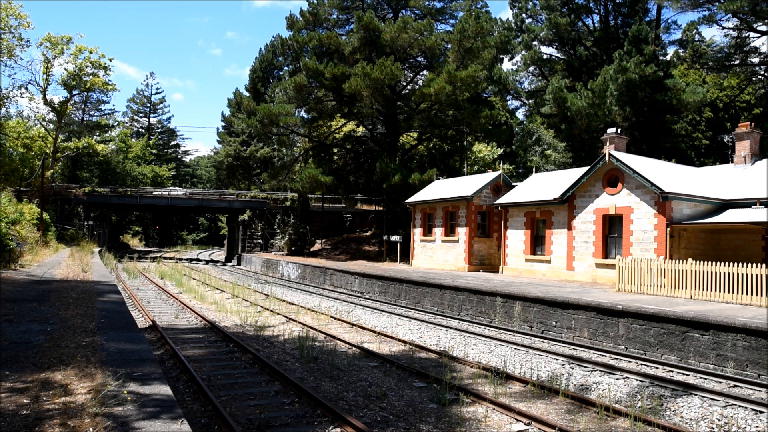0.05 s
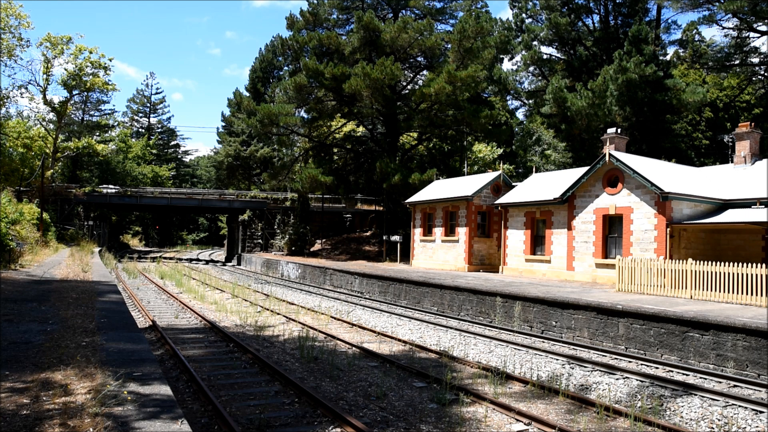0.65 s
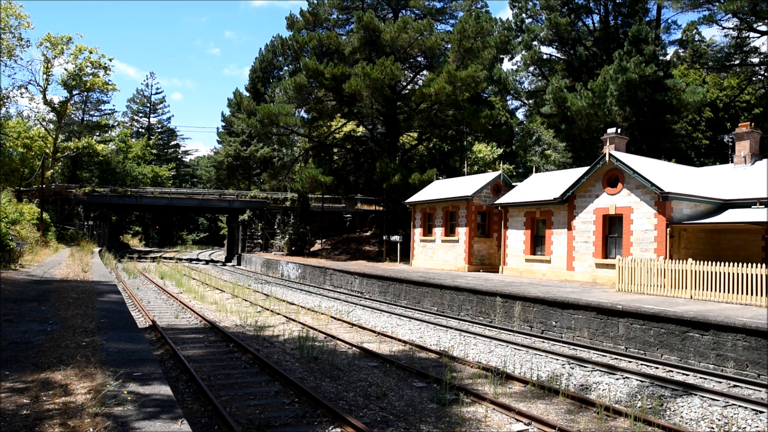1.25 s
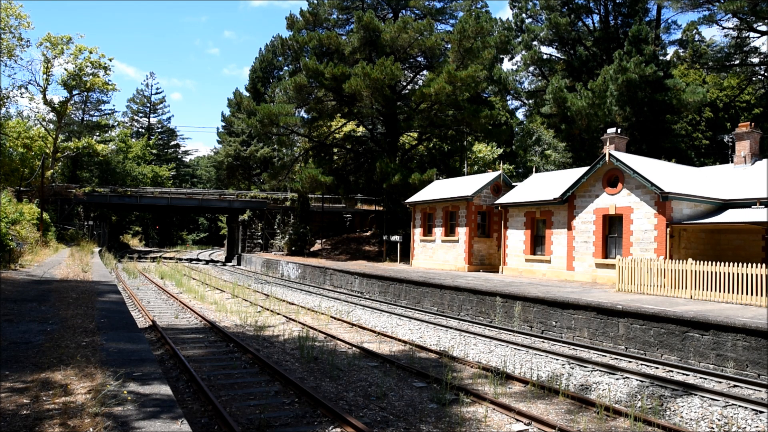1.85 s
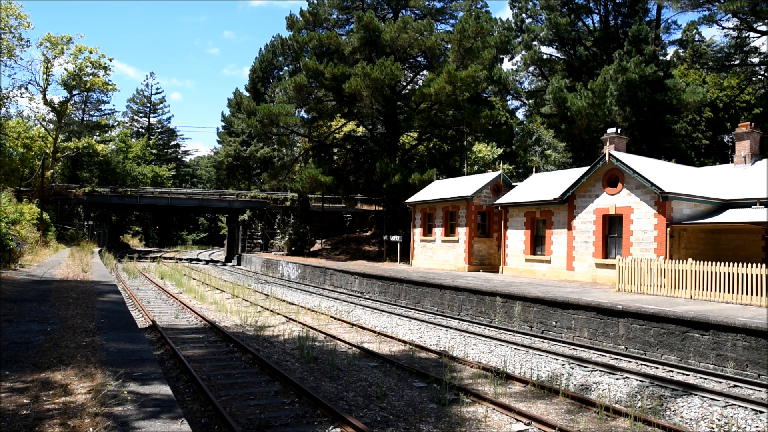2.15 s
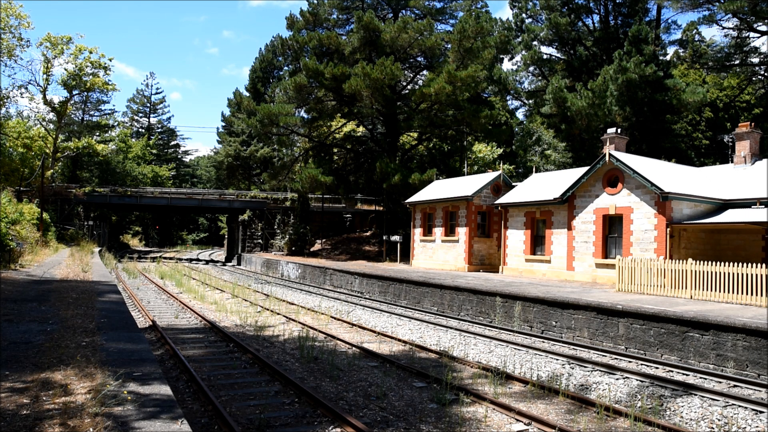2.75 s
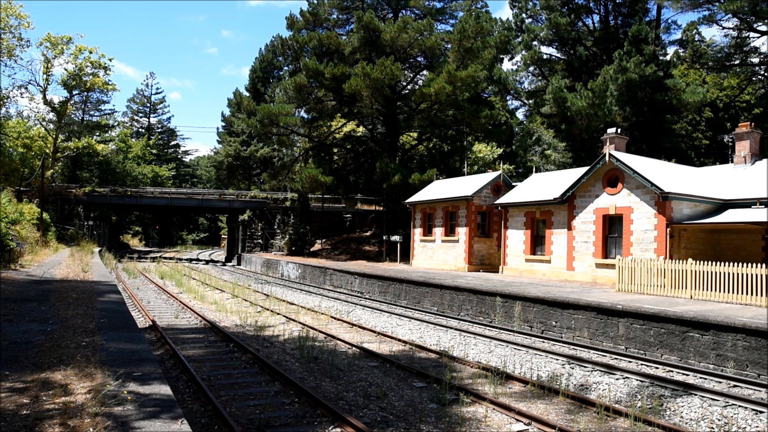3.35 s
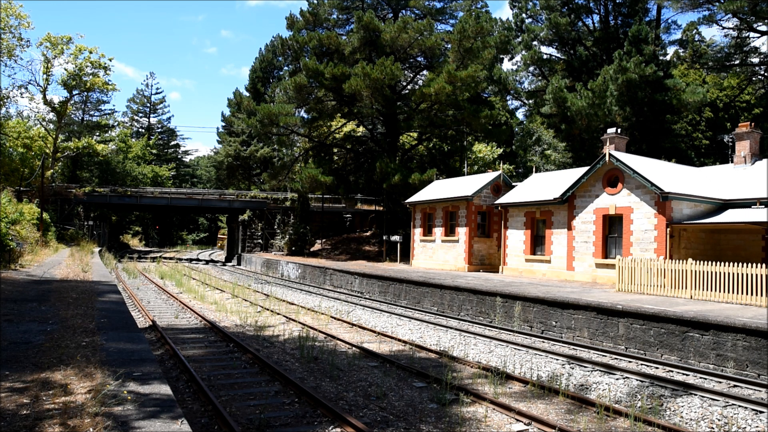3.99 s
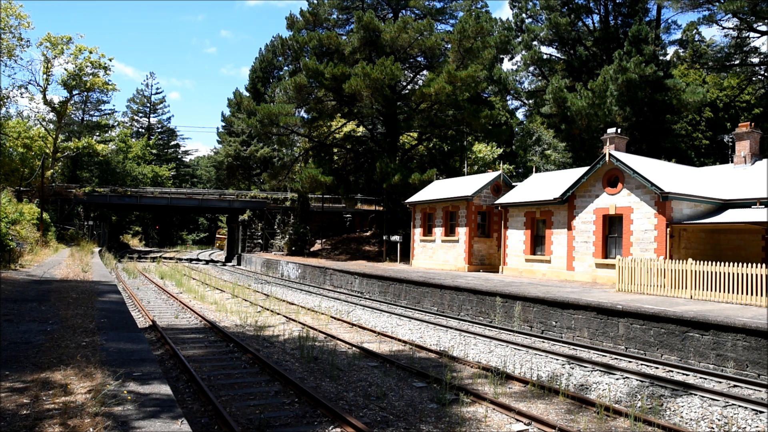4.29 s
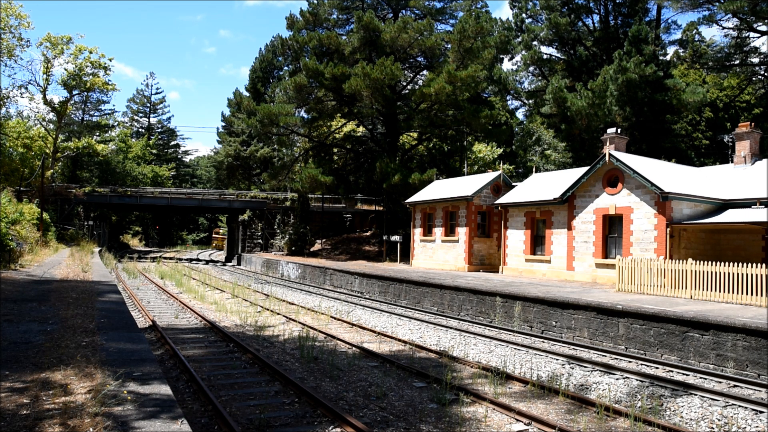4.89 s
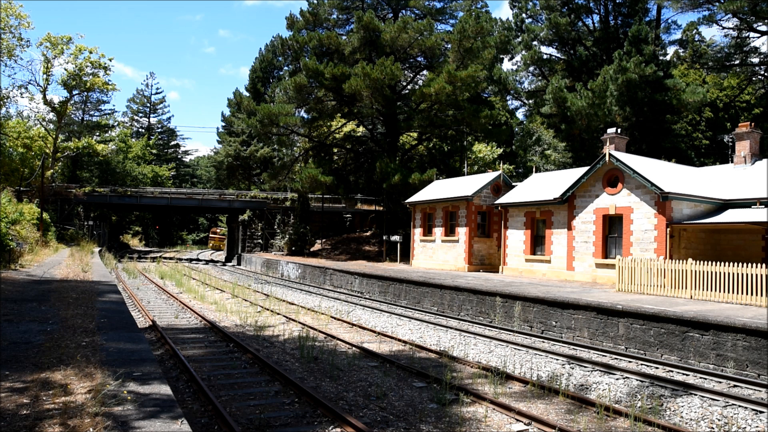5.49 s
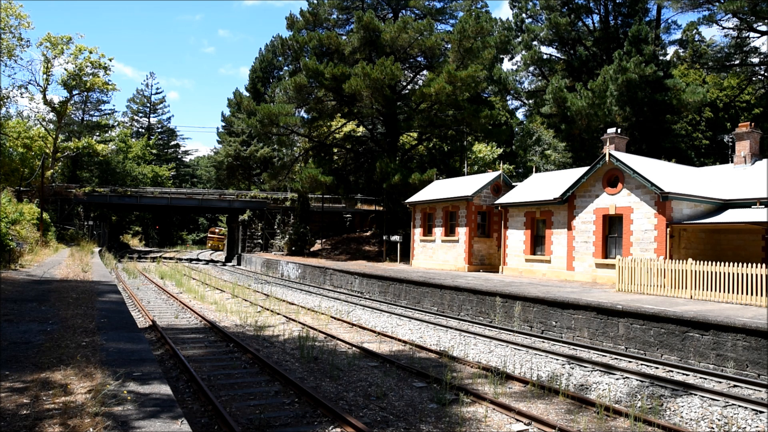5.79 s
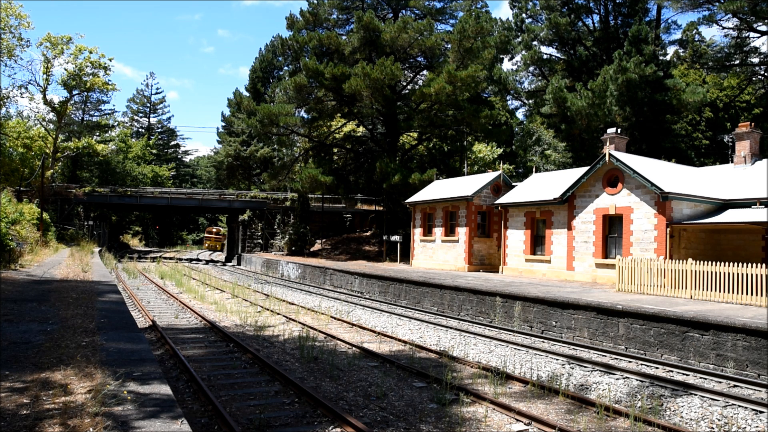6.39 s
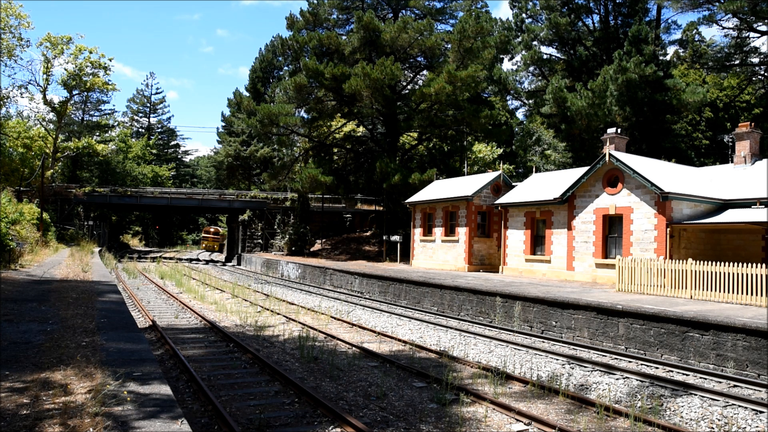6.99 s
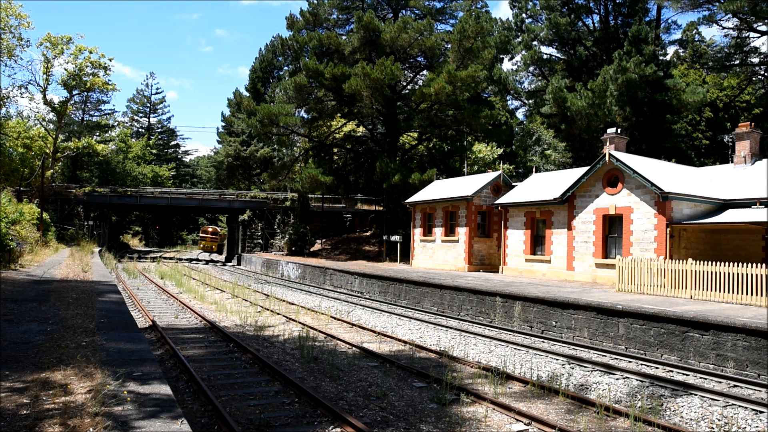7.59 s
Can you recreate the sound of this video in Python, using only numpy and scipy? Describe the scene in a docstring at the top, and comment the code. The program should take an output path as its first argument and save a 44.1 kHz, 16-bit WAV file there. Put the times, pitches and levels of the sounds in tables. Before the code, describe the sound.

A diesel freight train approaches a quiet country station, its steel wheels squealing louder and louder over a rolling roar.

```python
"""A diesel freight train rounds a curve towards a quiet country station among tall trees.
From the start the engine drones and whines under the roar of the rolling wagons. Many slipping wheels
squeal on the same few notes, and single wheels sing out above the rest. As the train nears, the wheel
rims (flanges) hiss louder against the rail. From five seconds on, the lowest squeal blares in bursts."""
import sys
import numpy as np
from scipy import signal
from scipy.fft import rfft, irfft
from scipy.io import wavfile
from scipy.ndimage import uniform_filter1d, minimum_filter1d

SR = 44100
rng = np.random.default_rng(int(sys.argv[2]) if len(sys.argv) > 2 else 0)


def to_wav(sig):
    """Store sig (one row per channel, or 1-D mono) as 16-bit WAV at the path in sys.argv[1].

    Samples outside -1..1 are clipped; the rate is SR.
    """
    pcm = np.clip(np.atleast_2d(sig), -1, 1) * 32767
    pcm = np.round(pcm).astype(np.int16)
    wavfile.write(sys.argv[1], SR, pcm.T)  # frames by channels


N = 336924
T, HZ = np.arange(N) / SR, np.fft.rfftfreq(N, 1 / SR)
START_DISTANCE_M, SPEED_M_PER_S = 210, 14.15
CRANK_HZ, CYLINDERS = 15.36, 8
BLOWER_HZ, BLOWER_DB = 825, -44

# Levels are relative: the functions add their own gains.
# the engine's firing note: t/s, level/dB
FIRING_LEVEL = [(0.0, -53), (0.22, -64), (0.38, -49), (0.95, -49), (1.2, -60), (1.6, -62), (1.8, -49),
                (2.3, -48), (2.65, -43.5), (3.45, -42), (3.72, -49), (4.35, -43), (5.6, -42.5), (6.6, -44),
                (6.95, -62), (7.6, -51)]
# other exhaust notes: multiple of the crank rate, level/dB
EXHAUST_NOTES = [(4, -18), (5, -15.5), (6, -11.5), (7, -8.5), (9, -3), (10, -2), (11, -9.5), (12, -8),
                 (13, -12), (14, -11), (15, -9), (16, -6), (18, -11), (22, -0.5), (23, 1), (25, 0),
                 (26, -1.5)]
# gear whines: f/Hz, level/dB
GEAR_NOTES = [(299.5, -51.5), (484, -52), (599, -46.5), (726, -44.5), (902, -53), (968, -45), (1050, -46),
              (1101, -53), (1210, -44.5), (1265, -48.5), (1374, -48), (1449, -50)]
# peaks of the blower's whine: t/s, level/dB
BLOWER_SWELLS = [(0.03, -38), (0.38, -38), (0.93, -33.5), (1.66, -36.5), (3.1, -42), (3.95, -36.5),
                 (4.43, -33.5), (5.38, -30.5), (6.13, -30.5), (7.12, -31.5), (7.55, -35)]
# the rolling roar: t/s, level/dB
ROLLING_LEVEL = [(0.0, -30.5), (0.08, -30.5), (1.45, -28.5), (2.26, -28.5), (4.25, -26), (7.64, -24)]
# tone colours of wagon rumble, wheel roar, rail hiss, top hiss and grinding rims: f/Hz, level/dB
RUMBLE_COLOUR = [(25, -34.5), (50, -25.5), (85, -24), (125, -16), (190, -19.5), (270, -15), (340, -10),
                 (430, -12), (580, -9), (700, -6.5), (900, -33)]
ROAR_COLOUR = [(380, -12), (600, -10.5), (760, -5), (1000, -5), (1350, -2.5), (1650, -4.5), (1900, -6),
               (2450, -17)]
RAIL_COLOUR = [(1700, -26.5), (1950, -6), (2400, -2.5), (3200, -4.5), (4000, -7), (4800, -10.5),
               (6400, -13), (8000, -25), (9000, -35)]
TOP_HISS_COLOUR = [(8500, -26), (9700, -13), (10400, -9.5), (10750, -7), (11400, -7.5), (12700, -6),
                   (14300, -1), (16000, 4.5)]
FLANGE_COLOUR = [(6600, -22), (6950, -18), (7140, -0.5), (7215, 1), (7260, -1), (7360, -3), (7460, -9),
                 (7700, -12), (8000, -19), (8400, -45)]
# the grinding rims: t/s, level/dB
FLANGE_LEVEL = [(0.0, -38), (2.9, -33), (3.5, -35), (4.3, -31.5), (5.5, -31.5), (6.3, -27), (7.0, -28),
                (7.6, -27)]
# three notes at which wheels ring, each followed by its rough octave; a skirt is a band's soft edge:
# f/Hz, spread/Hz, skirt level/dB, skirt width/spreads, level/dB, rise/dB per dB of nearness
WHEEL_NOTES = [(2024, 90, -11, 1.2, -38, 0.0), (4020, 110, -8, 1.5, -60.5, 2.4),
               (5516, 180, -3, 1.1, -30.3, 1.75), (10900, 450, -8, 1.5, -55.5, 0.9),
               (7080, 170, -6, 1.2, -31.3, 1.7), (14205, 90, -6, 3.0, -49, 1.1)]
# swells of the low, middle and high wheel notes and of two octaves: t/s, level/dB
LOW_SWELL = [(0.0, 4.5), (0.25, -0.5), (1.3, -5), (2.0, 3.5), (3.6, 6.5), (4.3, 11.5), (4.9, 12),
             (5.4, 15.5), (6.3, 17), (6.8, 18.5), (7.05, 16.5), (7.3, 10.5), (7.64, 5.5)]
LOW_OCTAVE_SWELL = [(0.0, -1), (3.2, -1), (5.0, 2), (5.55, 4), (5.8, 10.5), (6.5, 4), (6.8, 13.5),
                    (7.3, 10.5), (7.6, 3)]
MIDDLE_SWELL = [(0.0, -1), (0.33, -4), (0.45, -1.5), (1.2, 0.5), (1.4, 0), (2.7, 0), (3.3, 0.5), (4.35, 0),
                (5.0, 0.5), (6.3, 0.5), (7.4, 1)]
MIDDLE_OCTAVE_SWELL = [(0.0, -2), (2.15, -11), (2.35, 2), (2.75, 3), (3.2, -1), (4.2, 0), (5.4, -6),
                       (6.35, -1), (6.6, -2), (7.3, -7.5), (7.6, -7)]
HIGH_SWELL = [(0.0, 1.5), (0.5, -0.29), (1.6, -1.4), (3.0, -1.8), (3.5, 0.57), (3.8, -0.46), (5.2, 0.62),
              (6.2, 0.53), (7.6, 0.71)]
# single wheels singing out: start t/s, length/s, f/Hz, glide/Hz per s, level/dB, roughness (0-1)
SOLO_SQUEALS = [(-0.1, 0.9, 14234, 0, -41.5, 0.1), (0.36, 0.28, 14212, 0, -39, 0.1),
                (0.33, 1.0, 7123, 0, -32, 0.2), (0.33, 0.42, 5502, -20, -31, 0.3),
                (0.4, 0.9, 7042, 0, -36, 0.3), (0.45, 0.15, 2031, 0, -32.5, 0.6),
                (1.25, 0.45, 14233, 0, -42.5, 0.1), (1.22, 0.8, 5512, -10, -33, 0.6),
                (1.4, 1.55, 5604, 0, -30.5, 0.4), (1.7, 0.2, 5490, 0, -29, 0.5),
                (1.7, 1.45, 7122, 0, -31, 0.2), (1.93, 0.25, 2010, 0, -35, 0.7),
                (2.05, 1.6, 14234, 0, -41, 0.1), (2.24, 0.6, 12619, 0, -42.5, 0.35),
                (2.25, 0.75, 11055, 0, -49, 0.3), (2.95, 0.4, 5600, 0, -31, 0.3),
                (3.05, 0.35, 1990, 0, -31, 0.7), (3.0, 1.45, 7122, 0, -28, 0.2),
                (3.15, 0.48, 14168, 0, -43.5, 0.1), (3.2, 0.45, 14298, 0, -45, 0.1),
                (3.3, 0.4, 7188, 0, -30, 0.2), (3.43, 0.12, 7188, 0, -25, 0.1),
                (3.4, 0.26, 5592, 0, -27.5, 0.3), (3.75, 0.2, 2032, 0, -28.5, 0.6),
                (3.8, 0.7, 11055, 0, -48.5, 0.3), (3.9, 1.15, 14233, 0, -43.5, 0.2),
                (4.35, 0.3, 7123, 0, -28, 0.2), (4.4, 0.95, 12772, 0, -52, 0.4),
                (4.68, 0.32, 7123, 0, -22.5, 0.2), (4.6, 1.1, 14196, 0, -47, 0.2),
                (4.95, 0.27, 5568, -50, -21.5, 0.3), (5.15, 0.27, 7123, 0, -23, 0.2),
                (5.3, 0.4, 5545, -70, -26, 0.5), (5.25, 1.55, 2028, 0, -27.5, 0.8),
                (5.45, 0.58, 5502, -4, -21, 0.3), (5.58, 0.4, 7123, 0, -24.5, 0.3),
                (5.55, 1.05, 7092, -95, -27.5, 0.7), (5.65, 1.6, 12772, 0, -50, 0.4),
                (5.7, 1.1, 14233, 0, -41, 0.15), (6.05, 1.85, 7123, 0, -20, 0.2),
                (6.08, 0.38, 5500, -30, -20.5, 0.5), (6.2, 0.68, 2058, 0, -22, 0.6),
                (6.4, 1.45, 14198, 0, -41.5, 0.2), (6.46, 0.17, 7230, 0, -24, 0.2),
                (6.45, 1.1, 11055, 0, -44.5, 0.3), (6.7, 1.1, 14298, 0, -46.5, 0.2),
                (7.05, 0.6, 14234, 0, -38, 0.1), (6.75, 0.5, 5452, 0, -28, 1),
                (7.2, 0.65, 5440, -20, -25.5, 0.8), (6.95, 0.55, 5614, 0, -27.5, 0.7)]
# faint, very high wheel notes: f/Hz, level/dB
RING_NOTES = [(10908, -60), (11055, -62), (12620, -61), (12772, -65)]
# blares of the lowest wheel note: peak t/s, f/Hz, level/dB
BLARES = [(5.02, 2040, -20), (5.102, 2035, -19.5), (5.16, 2030, -22), (5.226, 2030, -17.5),
          (5.305, 2025, -20), (5.37, 2020, -17.5), (5.445, 2025, -18), (5.73, 2025, -19), (5.82, 1995, -17),
          (5.985, 2045, -21), (6.14, 2060, -20), (6.25, 2060, -16.5), (6.32, 2055, -15.5),
          (6.42, 2030, -18.5), (6.522, 2025, -13), (6.585, 2056, -18), (6.705, 2056, -13.5),
          (6.885, 2010, -15), (7.13, 2030, -18)]
# how alike left and right sound: f/Hz, likeness (0-1)
STEREO_LIKENESS = [(30, .75), (120, 0.9), (1000, 0.89), (2000, 0.9), (3000, 0.99), (4700, 0.89),
                   (5500, 0.99), (6300, 0.66), (7100, 0.65), (8000, 0.84), (11000, 0.26), (14200, 0.9)]
# how far the left microphone opening leads the right: f/Hz, phase/rad
LEFT_LEAD = [(30, 0.26), (1000, 0.27), (3000, 0.78), (4400, 1.43), (5500, 1.3156), (6600, 1.5), (7100, 1.2),
             (7800, -1.2), (10500, -0.45), (11700, 3), (12500, -3), (13600, -1.5), (15500, -2.5)]
# how much louder the left opening is: f/Hz, level/dB
LEFT_BOOST = [(30, 4), (100, -3), (350, -2.5), (700, 0), (1400, -1), (2000, 1.5), (3500, -0.5), (5500, 1.5),
              (7100, 1), (11000, 0.5), (12700, 7.5), (14200, -2.5), (15500, 0.5)]
# the microphone's deep dip in the treble: f/Hz, level/dB
TREBLE_DIP = [(8000, 0.5), (8280, -8.5), (8400, -34), (9550, -22), (9700, -9), (10500, 2.5)]


def from_db(db):
    """Turn decibels into a gain."""
    return 10 ** (np.asarray(db) / 20)


def rms_one(x):
    """Scale a signal to an average strength (rms) of 1."""
    return x / np.sqrt(np.mean(x ** 2) + 1e-20)


def in_time(points):
    """Read a time table at every sample."""
    return np.interp(T, *np.transpose(points))


def at_hz(points, hz=HZ):
    """Read a table on a log-frequency axis."""
    f, value = np.transpose(points)
    return np.interp(np.log(hz + 1), np.log(f + 1), value)


def colour(points):
    """Gain at each frequency, falling steeply beyond the table's ends."""
    outside = np.minimum(1, np.minimum(HZ / points[0][0], points[-1][0] / (HZ + 1)))
    return from_db(at_hz(points)) * outside ** 8


def drift(rate_hz):
    """A smooth random wobble, about 1 in size."""
    pole = np.exp(-200 * np.pi * rate_hz / SR)
    steps = rng.standard_normal(N // 100 + 2002)   # one per 100 samples, plus time to settle
    slow = signal.lfilter([1], [1, -2 * pole, pole * pole], steps)[2000:]
    return np.interp(np.arange(N) / 100, np.arange(len(slow)), rms_one(slow))


def noise(gain):
    """Stereo noise of a given colour, partly alike left and right."""
    mid, side = rng.standard_normal((2, len(HZ))) + 1j * rng.standard_normal((2, len(HZ)))
    alike = np.clip(at_hz(STEREO_LIKENESS), 0, .99)
    spectrum = np.sqrt(1 + alike) * mid + np.sqrt(1 - alike) * side * [[1], [-1]]
    return rms_one(irfft(gain * spectrum, N))


def tone(hz, scatter, flutter_hz):
    """A pure tone plus shifting reflections, which make it fade and flutter."""
    phase = 2 * np.pi * (np.cumsum(hz + np.zeros(N)) / SR + rng.random())
    fading = (1 + scatter * drift(flutter_hz)) * np.cos(phase)
    return rms_one(fading + scatter * drift(flutter_hz) * np.sin(phase))


def smear(hz, spread_hz):
    """A narrow band: motion shifts one pitch differently along each echo path (Doppler effect)."""
    return 1 / np.sqrt(1 + (2 * (HZ - hz) / spread_hz) ** 16)


def nearness_db():
    """Level gained as the train nears: 0 dB at first, 6 dB more at half the distance."""
    return 20 * np.log10(START_DISTANCE_M / np.maximum(START_DISTANCE_M - SPEED_M_PER_S * T, 1))


def exhaust(speed):
    """Eight firings a turn make the drone; unequal cylinders add other multiples of the crank rate."""
    crank_hz = CRANK_HZ * speed
    firing = from_db(in_time(FIRING_LEVEL) - 3.5) * tone(CYLINDERS * crank_hz, 0.22, flutter_hz=2.5)
    others = sum(from_db(db) * tone(k * crank_hz, 0.55, flutter_hz=1.75) for k, db in EXHAUST_NOTES)
    return firing + from_db(-53 + 0.68 * nearness_db()) * others


def gears(speed, whine_db=-5.5, echo_db=-37.0, echo_drop=0.0163):
    """Gears whine. Tree echoes of gears and blower lack the Doppler rise, so they lie just below."""
    whine = sum(from_db(db) * tone(hz * speed, 0.52, flutter_hz=1.77) for hz, db in GEAR_NOTES)
    notes = GEAR_NOTES + [(BLOWER_HZ, BLOWER_DB)]
    echoes = noise(sum(from_db(db) * smear(hz * (1 - echo_drop), 2 * echo_drop * hz) for hz, db in notes))
    return from_db(1.28 * nearness_db()) * (from_db(whine_db) * whine + from_db(echo_db) * echoes)


def blower(speed, width_s=0.11):
    """The engine's air blower: one thin whine that swells and sinks about once a second."""
    swells = sum(from_db(db) * np.exp(-.5 * ((T - s) / width_s) ** 2) for s, db in BLOWER_SWELLS)
    return np.hypot(swells, from_db(BLOWER_DB)) * tone(BLOWER_HZ * speed, 0.36, flutter_hz=2.7)


def wagons(unrest_db=0.5):
    """Rough steel rolls on rough steel: the bodies rumble, wheels and rails roar and hiss."""
    level_db = in_time(ROLLING_LEVEL)
    rumble_db = level_db.mean() - 11 + 0.74 * (level_db - level_db.mean())
    rumble = from_db(rumble_db + unrest_db * drift(3.8)) * noise(colour(RUMBLE_COLOUR))
    roar = from_db(-1.9) * noise(colour(ROAR_COLOUR)) + from_db(-7) * noise(colour(RAIL_COLOUR))
    hiss = from_db(-36.5 + 0.43 * nearness_db() + unrest_db * drift(2.5)) * noise(colour(TOP_HISS_COLOUR))
    return rumble + from_db(level_db + unrest_db * drift(27.0)) * roar + hiss


def flanges():
    """The wheel rims grind along the rail with a sharp hiss."""
    return from_db(in_time(FLANGE_LEVEL)) * noise(colour(FLANGE_COLOUR))


def wheel_chorus(surge_db=0.46, surge_hz=10.0):
    """Unequal wheels and echoes blur each note into a band; slipping adds soft edges and surges."""
    swells = (LOW_SWELL, LOW_OCTAVE_SWELL, MIDDLE_SWELL, MIDDLE_OCTAVE_SWELL, HIGH_SWELL, HIGH_SWELL)
    out = 0
    for swell, (hz, spread_hz, skirt_db, skirt_width, level_db, rise) in zip(swells, WHEEL_NOTES):
        skirt = from_db(skirt_db) / (1 + (2 * (HZ - hz) / spread_hz / skirt_width) ** 2)
        gain = from_db(level_db + rise * nearness_db() + in_time(swell) + surge_db * drift(surge_hz))
        out = out + gain * noise(np.hypot(smear(hz, spread_hz), skirt))
    return out


def wheel_solos(attack_s=0.073, waver=0.0008, flutter_hz=13.3, chatter_db=3.0, chatter_hz=21.0):
    """A wheel sticks and slips in step with one note and sings; some notes sink as it turns away."""
    out = 0
    for start, length, hz, glide, db, rough in SOLO_SQUEALS:
        age = T - start
        release_s = min(0.18, length / 2)
        ramp = np.clip(np.minimum(age / attack_s, (length - age) / release_s), 0, 1)
        envelope = from_db(db) * np.sin(np.pi / 2 * ramp)
        pitch = hz * (1 + waver * rough * drift(flutter_hz)) + glide * age
        # the rougher the squeal, the more its echoes differ left and right and its grip chatters
        unlike = np.sqrt(1 - np.clip(at_hz(STEREO_LIKENESS, hz), 0, 1))
        side = 2.6 * rough * unlike * drift(flutter_hz) * np.sin(2 * np.pi * np.cumsum(pitch) / SR)
        chatter = from_db(chatter_db * rough * drift(chatter_hz))
        out = out + envelope * chatter * (tone(pitch, rough, flutter_hz) + side * [[1], [-1]])
    return out


def thin_rings(swell_db=1.5, swell_hz=0.57):
    """Very high notes come and go as one wheel after another rubs the rail."""
    out = 0
    for hz, db in RING_NOTES:
        gain = from_db(db + 0.91 * nearness_db() + swell_db * drift(swell_hz))
        out = out + gain * tone(hz, 0.56, flutter_hz=8.0)
    return out


def wheel_bursts(width_s=0.012, waver=0.004, octave_db=-24):
    """The lowest wheel note catches and blares for an instant, with a faint octave above."""
    peaks_s, hz, _ = np.transpose(BLARES)
    pitch = np.interp(T, peaks_s, hz) * (1 + waver * drift(19.8))
    phase = 2 * np.pi * np.cumsum(pitch) / SR
    envelope = sum(from_db(db) * np.exp(-.5 * ((T - s) / width_s) ** 2) for s, _, db in BLARES)
    return envelope * rms_one(np.sin(phase) + from_db(octave_db) * np.sin(2 * phase))


def limiter(x, window=441):
    """Turn the sound down for a few milliseconds around any peak above 1."""
    allowed = np.minimum(1, 1 / (np.abs(x).max(axis=0) + 1e-9))
    return x * uniform_filter1d(minimum_filter1d(allowed, window), window)


def scene():
    """The whole train: engine, wagons and squealing wheels."""
    speed = 1 + 0.000962 * drift(0.51)   # the engine's pace wanders slightly around 1
    engine = exhaust(speed) + gears(speed) + blower(speed)
    return engine + wagons() + flanges() + wheel_chorus() + wheel_solos() + thin_rings() + wheel_bursts()


def record(dry, cutoff_hz=15750):
    """Two close microphone openings differ in phase and level; a treble dip, limiter and cut follow."""
    left = from_db(at_hz(LEFT_BOOST) / 2) * np.exp(.5j * at_hz(LEFT_LEAD))
    openings = np.array([left, 1 / left])
    heard = irfft(rfft(dry) * openings * from_db(at_hz(TREBLE_DIP)), N)
    top_cut = np.clip((cutoff_hz - HZ) / 60 + 1, 0, 1)
    return irfft(rfft(limiter(heard)) * top_cut, N)


dry = scene()
out = record(dry)
to_wav(out)
```